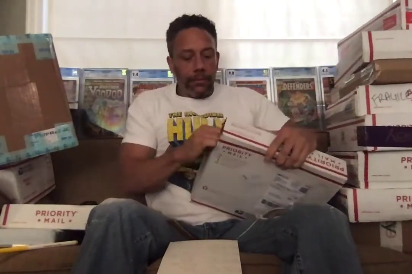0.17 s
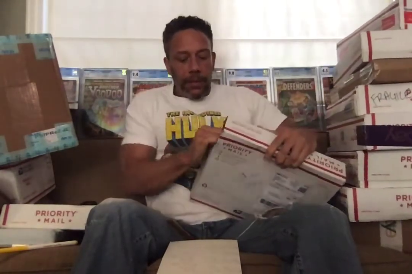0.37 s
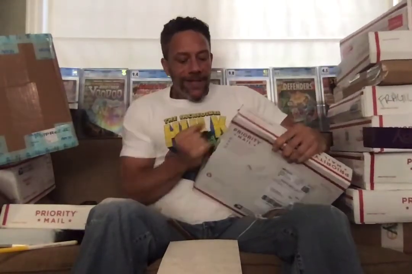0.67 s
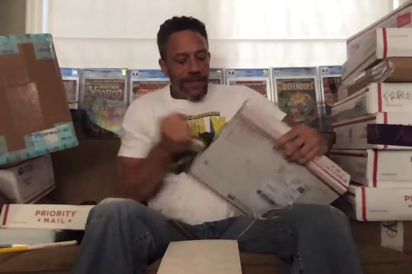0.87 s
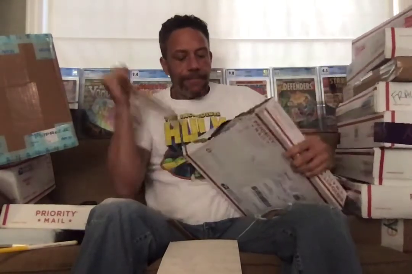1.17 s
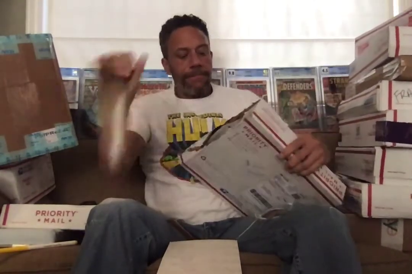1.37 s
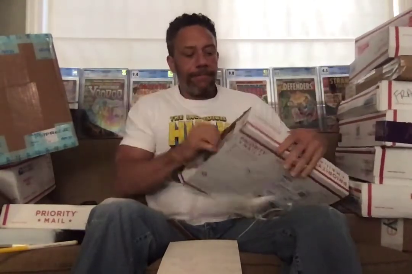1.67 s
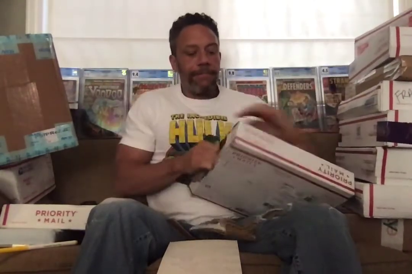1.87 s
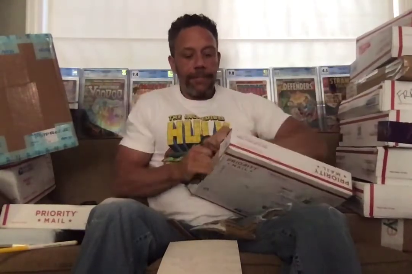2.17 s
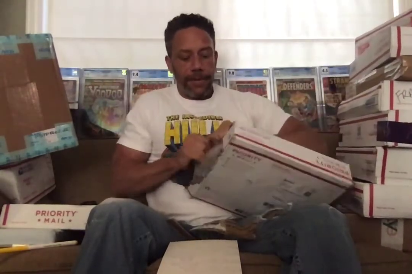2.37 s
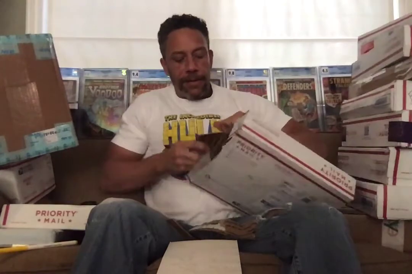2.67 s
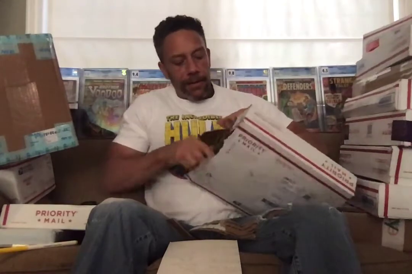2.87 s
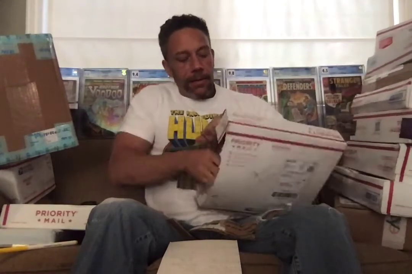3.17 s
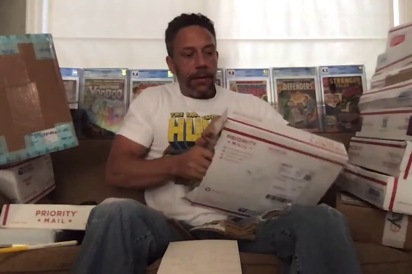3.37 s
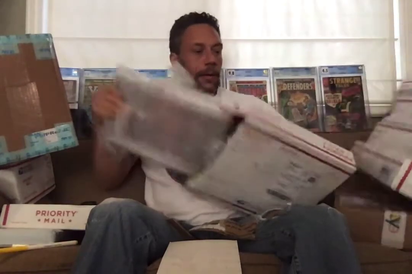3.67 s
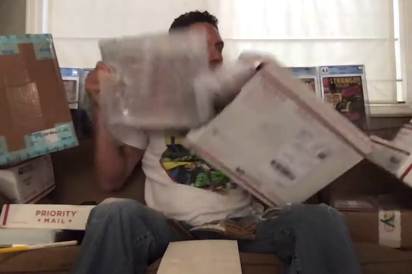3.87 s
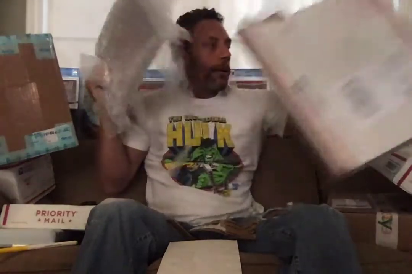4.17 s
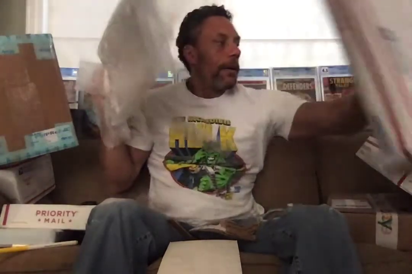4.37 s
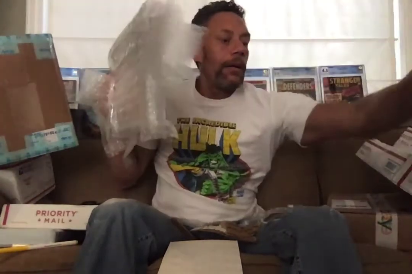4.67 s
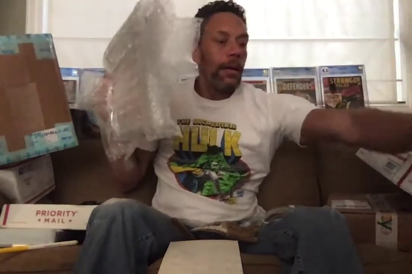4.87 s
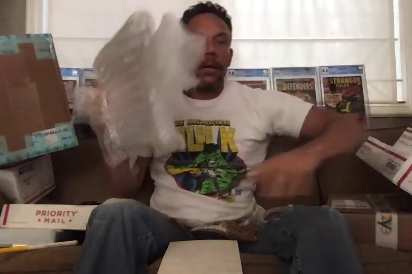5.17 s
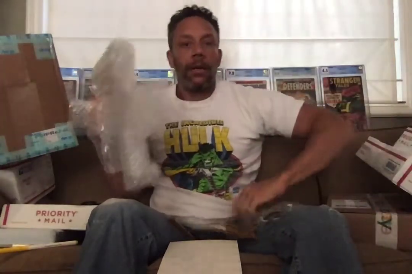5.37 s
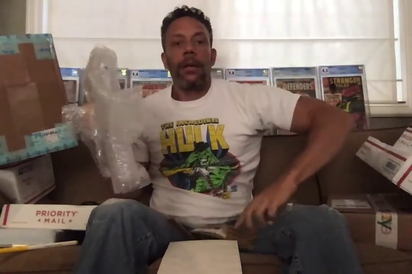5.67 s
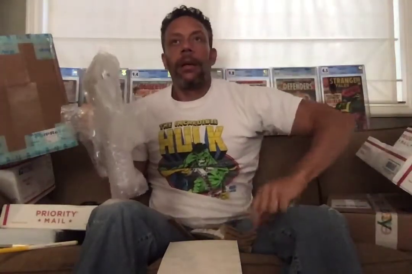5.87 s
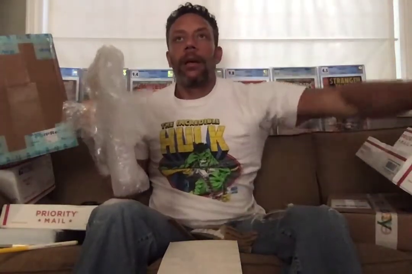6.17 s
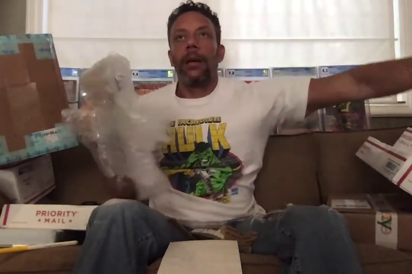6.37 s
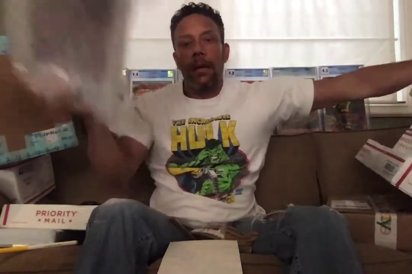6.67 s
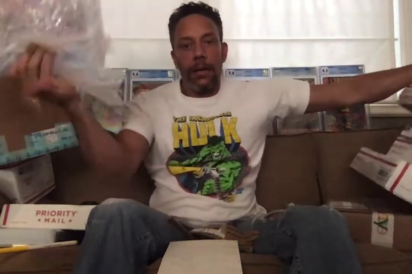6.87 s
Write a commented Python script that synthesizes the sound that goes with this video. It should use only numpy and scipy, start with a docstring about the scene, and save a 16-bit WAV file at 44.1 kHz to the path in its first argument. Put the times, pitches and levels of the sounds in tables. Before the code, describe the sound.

A small furnished room with a quiet low hush and deep faint rumble, heard by one nearby microphone. From 0 to 0.5 s card scuffs lightly under hands, with tiny cracks and a hollow bump. Between 0.55 and 1.2 s a tear strip rips in short fibrous jerks, with bright snaps near 0.65 s and another at 1.13 s. Until 2.5 s there are only soft scrapes and small creases. Around 2.5 to 3.1 s dull hollow bumps accompany sliding; scuffing grows from 3.1 s, with a crack at 3.43 and deeper knocks at 3.8 and 4.1. The tossed box booms loudest at about 4.2 s, thuds again at 4.53 and lands heavily at 5.03, with a brief raspy scrape near 5.15 and faint slaps by 5.3. Bubble wrap then rustles and ticks softly to 7 s, with a slightly sharper crackle at 6.7.

```python
"""Unpacking a cardboard box on a couch

Someone rips off a tear strip and drags out a bubble-wrapped packet: tiny clicks over hiss, shaped by hand moves.
The hollow box booms as fading sine modes under the hands, is tossed aside, thumps, tumbles and lands with a
slap of filtered noise. Creases snap, short bands of rasp stand out and panels judder; the wrap rustles on.
The even echo tail of a small furnished room, a quiet hush and a deep rumble surround it."""
import sys
import numpy as np
from scipy import signal
from scipy.io import wavfile
from scipy.ndimage import map_coordinates

SR = 44100
rng = np.random.default_rng(int(sys.argv[2]) if len(sys.argv) > 2 else 0)


def pcm_store(signal):
    """Save signal as 16-bit PCM."""
    levels = np.round(np.clip(np.atleast_2d(signal), -1, 1) * 32767)
    wavfile.write(sys.argv[1], SR, levels.astype(np.int16).T)


N = 310134  # length of the scene in samples

# In the three tables of hand moves, levels and relative levels are before the trims given to friction().

# Pulls on the tear strip. Each row: start in seconds, length in seconds, level in dB,
# low body in dB relative to that level, fine fizz in dB relative to that level.
PULL_MOVES = [(0.553, 0.11988, -34.5, -1, -5), (0.676, 0.0733, -45, -0.5, -2), (0.89, 0.048, -40, -7.5, 0),
              (0.934, 0.064, -30.5, -6.5, -1.5), (1.074, 0.05485, -44.5, -2.5, 0),
              (1.126, 0.025, -31, -2, -8), (1.157, 0.01291, -41.5, 5, -19)]
# Tension builds through a pull until the fibres let go. One row: attack in seconds, build from start
# to end in dB, arch of the middle over the ends in dB, release in seconds to fall 60 dB.
PULL_ENVELOPE = (0.0068, 7, 1.6, 0.12)


def tearing():
    """The strip parts the card fibre by fibre, in quick jerks."""
    fibres = crackle(per_s=6000, spread_db=3.0, clump_db=1.5, clump_per_s=210, hiss_db=-4)
    drifting = colour_drift(fibres, depth_db=3.0)
    return friction(drifting, PULL_MOVES, PULL_ENVELOPE, rasp_db=-4.0, body_db=3.5, fizz_db=-4.0)


# Card sliding under the hands. Each row: start in seconds, length in seconds, level in dB,
# low body in dB relative to that level, fine fizz in dB relative to that level.
SLIDE_MOVES = [(0.0, 0.046, -45, 4, -6.5), (0.067, 0.12, -53, -1.5, -3), (0.273, 0.048, -54, 3.5, -7),
               (0.393, 0.051, -57.5, 7, -29.5), (1.352, 0.05107, -53.5, -9, -1),
               (1.455, 0.095, -64.5, 3.5, -5), (1.677, 0.12, -48, -2, -3), (1.834, 0.13, -54.5, -3, -12),
               (2.072, 0.0897, -47, 0.5, -7.5), (2.197, 0.13, -58.5, 1.5, -4.5),
               (2.278, 0.04845, -47.5, -12, 0), (2.355, 0.07, -57.5, 8, -21.5),
               (2.44, 0.17, -48.5, 0.5, -3), (2.611, 0.13, -50.5, -9, -1.5), (2.778, 0.54, -53.5, 1, -1.5),
               (3.133, 0.19, -45.5, -3.5, -2.5), (3.394, 0.21, -42, -3, -2.5), (3.615, 0.21, -50, -4, -6),
               (3.759, 0.13, -42.5, -1, -6), (3.9, 0.13, -46.5, -1, -6),
               (4.003, 0.05096, -37.5, -5.5, -6.5), (4.085, 0.04537, -49, 9.5, -24),
               (4.667, 0.15, -60, 3, -8), (4.887, 0.075, -55.5, 9.5, -11), (5.15, 0.15, -48, 7.5, -11.5)]
# A slide speeds up and slows down again. One row: attack in seconds, build from start to end in dB,
# arch of the middle over the ends in dB, release in seconds to fall 60 dB.
SLIDE_ENVELOPE = (0.04, -2.5, 3, 0.6)


def rustling():
    """The packet drags out along the card: a dense, fine scuffing."""
    scuffs = crackle(per_s=1500, spread_db=4.0, clump_db=1.36, clump_per_s=110, hiss_db=2.0)
    drifting = colour_drift(scuffs, depth_db=3.5)
    return friction(drifting, SLIDE_MOVES, SLIDE_ENVELOPE, rasp_db=-3.0, body_db=1.5, fizz_db=-4.5)


# The bubble wrap shifts in the hand. Each row: start in seconds, length in seconds, level in dB,
# low body of the rustle in dB relative to that level, fine fizz in dB relative to that level.
WRAP_MOVES = [(5.388, 0.11, -53.5, 2.5, -8), (5.542, 0.091, -47, -7, -5.5), (5.695, 0.27, -54, -13, -5.5),
              (6.045, 0.049, -60.5, -15, 11), (6.076, 0.09, -50.5, -18, -0.5), (6.242, 0.026, -49, -6, 1),
              (6.507, 0.32, -54.5, -6, -5), (6.677, 0.087, -45.5, -10, -9), (6.764, 0.2583, -54, -9, -3)]
# The rustle fades in, sinks slightly and stops short. One row: attack in seconds, build from start
# to end in dB, arch of the middle over the ends in dB, release in seconds to fall 60 dB.
WRAP_ENVELOPE = (0.08, -2.5, -0.5, 0.01)


def crinkling():
    """Loose film buckles in sparse, separate ticks over its own swish."""
    ticks = crackle(per_s=310, spread_db=3.0, clump_db=2.0, clump_per_s=45, hiss_db=3)
    return friction(ticks, WRAP_MOVES, WRAP_ENVELOPE, rasp_db=-1.0, body_db=-0.5, fizz_db=-1.0)


# Colours of rubbing: the rasp of the surface, the low body of the sound, the finest fibres and film.
# Each row of all three: frequency in Hz, relative level in dB.
SURFACE_COLOUR = [(700, -23.5), (1100, -6), (1400, -3), (1650, -3.5), (2100, 2), (3000, -3), (4000, -3.5),
                  (5600, -12.5), (8000, -33.5)]
BODY_COLOUR = [(30, -8), (75, 10), (130, 7.5), (195, -7.5), (260, 3), (370, 0), (520, 0), (780, -3),
               (1250, -13), (1800, -29.5)]
FIZZ_COLOUR = [(3500, -35.5), (5500, -3), (6700, -2), (8000, -4), (10000, -7.5), (15000, -10.5),
               (16500, -16.5)]


def friction(drive, moves, envelope, rasp_db, body_db, fizz_db):
    """One crackle sounds as the rasp of the surface, as a low body and as fine fizz."""
    rasp_power, body_power, fizz_power = np.zeros((3, N))
    for start_s, length_s, db, body_relative_db, fizz_relative_db in moves:
        power = gesture(length_s, envelope) * amp(db) ** 2
        add(rasp_power, start_s, power * amp(rasp_db) ** 2)
        add(body_power, start_s, power * amp(body_relative_db + body_db) ** 2)
        add(fizz_power, start_s, power * amp(fizz_relative_db + fizz_db) ** 2)
    rasp = np.sqrt(rasp_power) * shaped(drive, SURFACE_COLOUR)
    body = np.sqrt(body_power) * shaped(drive, BODY_COLOUR)
    fizz = np.sqrt(fizz_power) * shaped(drive, FIZZ_COLOUR)
    return rasp + body + fizz


def gesture(length_s, envelope):
    """Power of one hand movement: attack, a tilted arch while it lasts, release."""
    attack_s, build_db, arch_db, release_s = envelope
    t = np.arange(round((length_s + release_s) * SR)) / SR
    done = np.minimum(t / length_s, 1)
    level_db = build_db * (done - .5) - arch_db * (2 * done - 1) ** 2
    fade_db = -60 * np.maximum(t - length_s, 0) / release_s
    return (np.minimum(t / attack_s, 1) * amp(level_db + fade_db)) ** 2


def crackle(per_s, spread_db, clump_db, clump_per_s, hiss_db, count=24):
    """Tiny ruptures of many sizes and colours, bunched by stick and slip, over smooth sliding hiss."""
    ruptures = rng.random(N) < per_s / SR
    sizes = amp(spread_db * np.minimum(rng.exponential(1, N), 5)) * ruptures
    kind = rng.integers(0, count, N)
    t = np.arange(128) / SR
    grains = rng.standard_normal((count, len(t))) * np.exp(-t / 0.00047)
    clicks = sum(np.convolve(sizes * (kind == k), evened(grains[k]))[:N] for k in range(count))
    hiss = amp(hiss_db) * rng.standard_normal(N)
    return evened((evened(clicks) + hiss) * amp(clump_db * wander(clump_per_s)))


def colour_drift(x, depth_db, per_s=22, per_octave=2.69):
    """Random patches of louder and softer colour drift over the rubbing sound."""
    hz, t, z = signal.stft(x, SR, nperseg=512)
    where = np.meshgrid(per_octave * np.log2(1 + hz / 200), t * per_s, indexing="ij")
    patches = map_coordinates(rng.standard_normal((48, 400)), where, order=1, mode="wrap")
    return signal.istft(z * amp(depth_db * patches), SR, nperseg=512)[1][:N]


# Short bands of coloured rasp noise, each around one pitch.
# Each row: middle in seconds, length in seconds, level in dB before the fades, pitch in Hz.
RASP_BANDS = [(0.411, 0.03, -50.5, 790), (0.737, 0.047, -39, 2160), (0.909, 0.075, -44.5, 2020),
              (1.407, 0.065, -52, 2200), (1.606, 0.02, -57.5, 1870), (2.279, 0.046, -48.5, 444),
              (2.318, 0.0301, -46, 10730), (2.379, 0.045, -44.5, 427), (2.51, 0.15, -49.5, 1350),
              (3.442, 0.027, -37, 3800), (4.042, 0.049, -38.5, 526), (4.043, 0.07, -45.5, 6040),
              (4.246, 0.06527, -43, 5800), (4.539, 0.03288, -44, 2304), (4.932, 0.1362, -51.5, 2080),
              (5.156, 0.041, -29, 2222), (5.227, 0.39, -47.5, 2240), (6.082, 0.074, -55.5, 2122),
              (6.714, 0.049, -40.5, 584), (6.732, 0.13, -47, 1030)]


def rasp_bands(sharpness=2.18):
    """Short bands of coloured rasp noise: crackle through one resonance, faded in and out."""
    drive = crackle(per_s=2400, spread_db=1.5, clump_db=-4.0, clump_per_s=170, hiss_db=-9.5)
    out = np.zeros(N)
    for middle_s, length_s, db, pitch_hz in RASP_BANDS:
        start_s = middle_s - length_s / 2
        piece = drive[round(start_s * SR):][:round(length_s * SR)]
        band = evened(ringing(piece, pitch_hz, sharpness))
        add(out, start_s, amp(db) * band * np.sqrt(np.hanning(len(piece))))
    return out


# Panels and air of the box.
# Each row: frequency in Hz, relative level in dB, time in seconds to fall 60 dB.
BOX_MODES = [(67.8, 5, 0.28), (103.84, -1.5, 0.26), (150, 1, 0.087), (211.04, 0, 0.068), (234.3, -0.5, .12),
             (270, -0.5, 0.11), (312.5, -2, 0.092), (364, 4.5, 0.073), (477, -1, 0.073), (650, -6, 0.088),
             (821.64, -8.5, 0.097), (977, -14, 0.044)]


def blows(reach_octaves=0.64, rise_s=0.00032, contact_cycles=2.6, slap_floor_hz=220, steepness=4.47, tick_db=-40):
    """Each blow booms the box modes near its centre, and the loose panels slap."""
    t, out = np.arange(SR // 2) / SR, np.zeros(N)
    hz, db, t60 = np.transpose(BOX_MODES)
    fades = amp(-60 * t / t60[:, None]) * (1 - np.exp(-t / rise_s))
    modes = np.sin(2 * np.pi * hz[:, None] * t) * fades
    signs = (-1) ** np.arange(len(hz))
    for s, boom_db, centre_hz, slap_db, bright_hz, slap_t60 in contacts():
        weights = amp(db) * np.exp(-.5 * (np.log2(hz / centre_hz) / reach_octaves) ** 2)
        boom = (weights * signs) @ modes / np.linalg.norm(weights)

        def softness(f):
            """Soft contact rolls the treble off; a faint dry tick stays above it."""
            thud = 1 / (1 + (f / bright_hz) ** steepness)
            tick = amp(tick_db) ** 2 / (1 + (f / 8000) ** 4)
            bass_cut = 1 + (slap_floor_hz / (f + 1)) ** 2
            return 10 * np.log10((thud + tick) / bass_cut)

        slap = evened(colour(rng.standard_normal(len(t)), softness))
        # a hard, bright contact also starts faster
        fading = amp(-60 * t / slap_t60) * (1 - np.exp(-t * bright_hz / contact_cycles))
        add(out, s, amp(boom_db) * boom + amp(slap_db) * slap * fading)
    return out


# Hands bump the box they hold.
# Each row: start in seconds, boom level in dB, centre of the modes reached in Hz.
HAND_BUMPS = [(0.296, -32, 400), (0.452, -44.5, 330), (1.451, -38.5, 286), (1.639, -39, 400),
              (2.536, -35, 202), (2.628, -30, 177), (2.666, -31.5, 139), (2.718, -35, 90),
              (2.943, -30.5, 378), (3.062, -35, 338), (3.523, -24.5, 234), (3.742, -30.5, 290),
              (3.804, -17, 106.5), (3.838, -22.5, 122), (4.097, -22.5, 230), (4.128, -23.5, 247.2)]
# A soft hand slaps faintly (dB relative to the boom); the higher the modes it reaches, the brighter.
KNOCK_SLAP_DB, KNOCK_BRIGHT_RATIO, KNOCK_T60_S = -15.5, 5.0, 0.11
# Card or film gives way with a sharp crack. Each row: start in seconds, crack level in dB before
# its rise and fade, boom level in dB, brightness in Hz.
SHARP_CRACKS = [(0.127, -33, -48, 1800), (0.139, -30.5, -55, 1590), (0.557, -29, -22, 3040),
                (0.656, -20.5, -20, 4850), (0.668, -18.5, -34, 4450), (1.128, -27.5, -25, 7000),
                (3.432, -28, -43, 4360), (6.251, -40, -58, 5220), (6.701, -33, -52, 1800)]
CRACK_CENTRE_HZ, CRACK_T60_S = 400, 0.03
# The tossed box hits, tumbles and lands. Each row: start in seconds, boom level in dB, centre of the modes
# reached in Hz, slap level in dB before its rise and fade, slap brightness in Hz, seconds for the slap to fall 60 dB.
BOX_LANDINGS = [(4.188, -17, 130, -16, 650, 0.31), (4.203, -15.5, 140, -19, 1850, 0.12),
                (4.228, -2, 220, -12, 1087, 0.09), (4.236, -12, 432.6, -34.5, 700, 0.059),
                (4.272, -16.5, 111, -26, 690, 0.2194), (4.531, -8, 181.1, -15, 604.9, 0.032),
                (4.544, -10, 240, -28, 1342, 0.1), (4.612, -20.5, 166, -28, 448, 0.08445),
                (5.029, -4.5, 143.6, -15.5, 756, 0.18), (5.048, -13, 450, -24, 1280, 0.063),
                (5.063, -8, 123, -27, 551, 0.045), (5.136, -25, 196, -24, 2025, 0.21446),
                (5.314, -27, 150, -28, 1830, 0.19), (5.337, -25.5, 232.3, -26.5, 3700, 0.15)]


def contacts():
    """Every blow on the box, as (s, boom dB, centre Hz, slap dB, brightness Hz, slap t60 s)."""
    knocks = [(s, db, hz, db + KNOCK_SLAP_DB, hz * KNOCK_BRIGHT_RATIO, KNOCK_T60_S)
              for s, db, hz in HAND_BUMPS]
    cracks = [(s, boom_db, CRACK_CENTRE_HZ, crack_db, bright_hz, CRACK_T60_S)
              for s, crack_db, boom_db, bright_hz in SHARP_CRACKS]
    return knocks + cracks + list(BOX_LANDINGS)


# A panel juddering as the box skids.
# Each row: start in seconds, length in seconds, level in dB, pitch halfway through in Hz.
PANEL_JUDDERS = [(1.137, 0.013893, -26.5, 372.3), (4.189, 0.03093, -4, 232.5), (4.353, 0.021, -30.5, 270),
                 (4.9, 0.0244, -43, 330), (5.031, 0.025, -15.5, 496), (5.059, 0.02, -16.5, 289.5)]


def judders(overtone_db=-19, ring_s=0.0019, sag=0.097):
    """Stick and slip locks onto one panel mode, which swells, sags in pitch and stops."""
    out = np.zeros(N)
    for start_s, length_s, db, pitch_hz in PANEL_JUDDERS:
        t = np.arange(round(2 * length_s * SR)) / SR
        sagging_hz = pitch_hz * (1 + sag * (.5 - t / length_s))
        phase = 2 * np.pi * np.cumsum(sagging_hz) / SR
        swing = (1 - np.exp(-t / ring_s)) * np.exp(-np.maximum(t - length_s, 0) / ring_s)
        tone = np.sin(phase) + amp(overtone_db) * np.sin(2 * phase)
        add(out, start_s, amp(db) * swing * tone)
    return out


# Single creases snapping over. Each row: start in seconds, level in dB before the decay, pitch in Hz.
CREASES = [(1.371, -47.5, 2800), (1.476, -46.5, 2150), (1.64, -41, 2310), (1.975, -50, 2060),
           (2.121, -41.5, 2280), (2.287, -42.5, 5900), (2.824, -43, 8000), (3.564, -33.5, 2620),
           (3.932, -45, 6860), (4.1, -56, 7200), (4.693, -54, 2400), (4.934, -44, 2240),
           (4.969, -48.5, 2400), (5.903, -53, 8900), (6.133, -40, 4390), (6.654, -46, 5000),
           (6.813, -42.5, 3500), (6.88, -41, 5000), (6.901, -60, 6000)]


def snaps(decay_s=0.0052, sharpness=1.0):
    """A crease flips: a few milliseconds of crack around one pitch."""
    t, out = np.arange(SR // 20) / SR, np.zeros(N)
    for start_s, db, pitch_hz in CREASES:
        crack = evened(ringing(rng.standard_normal(len(t)), pitch_hz, sharpness))
        add(out, start_s, amp(db) * crack * np.exp(-t / decay_s))
    return out


def ringing(x, pitch_hz, sharpness):
    """A broad resonance with steep skirts."""
    def gain_db(f):
        detuning = f / pitch_hz - pitch_hz / (f + 1)
        return -20 * np.log10(1 + (sharpness * detuning) ** 2)
    return colour(x, gain_db)


def amp(db):
    """Decibels to gain."""
    return 10 ** (np.asarray(db) / 20)


def evened(x):
    """Scales to an rms of one."""
    return x / np.sqrt(np.mean(x ** 2) + 1e-20)


def read(points, hz):
    """Reads a table on a log-frequency axis."""
    f, value = np.transpose(points)
    return np.interp(np.log(hz + 1), np.log(f + 1), value)


def add(mix, s, sound):
    """Adds a sound to the mix at a time in seconds."""
    part = mix[max(round(s * SR), 0):][:len(sound)]
    part += sound[:len(part)]


def colour(x, gain_db, size=4096):
    """Causal filter whose gain is a function of frequency."""
    hz = abs(np.fft.fftfreq(size, 1 / SR))
    log_gain = np.log(amp(gain_db(hz)) + 1e-5)
    # minimum phase: the filter responds as early as it can
    kernel = np.fft.ifft(np.exp(np.conj(signal.hilbert(log_gain)))).real
    return signal.oaconvolve(x, kernel[:size // 2])[:len(x)]


def shaped(x, points):
    """Gives x a spectrum whose skirts fall away outside the table, at unit rms."""
    def gain_db(hz):
        octaves_outside = abs(np.log2((hz + 1) / np.clip(hz + 1, points[0][0], points[-1][0])))
        return read(points, hz) - 20 * octaves_outside
    return evened(colour(x, gain_db))


def wander(per_s):
    """Random values of unit spread, joined by straight lines."""
    knots = rng.standard_normal(4096)
    return np.interp(np.arange(N) / SR * per_s, np.arange(len(knots)), knots, period=len(knots))


def room(x, half_turns_per_s=1.315, count=3, wet_db=-6):
    """Blends three random echo patterns in turn, for an even, uncoloured room tail."""
    turn = np.pi * (half_turns_per_s * np.arange(N) / SR + np.arange(count)[:, None] / count)
    shares = np.sqrt(2 / count) * np.cos(turn)
    echoes = sum(signal.fftconvolve(x * share, reflections())[:N] for share in shares)
    return x + amp(wet_db) * echoes


# How long the room's echoes last. Each row: frequency in Hz, time in seconds to fall 60 dB.
ECHO_TIMES = [(80, .3), (250, 0.5038), (1000, 0.37), (3000, 0.37852), (8000, 0.34), (15000, 0.42)]


def reflections(first_s=0.0034):
    """Close walls and furniture: dense echoes of random sign, each band dying at its own speed."""
    taps = rng.choice([-1., 1.], SR // 2) * (rng.random(SR // 2) < 6000 / SR)  # 6000 echoes per second
    taps *= np.arange(len(taps)) > first_s * SR
    hz, t, z = signal.stft(taps, SR, nperseg=256)
    fading = amp(-60 * t / read(ECHO_TIMES, hz)[:, None])
    tail = signal.istft(z * fading, SR, nperseg=256)[1]
    couch = lambda f: -10 * np.log10(1 + (560 / (f + 20)) ** 2)  # upholstery soaks up the bass
    return colour(tail / np.linalg.norm(tail), couch)


# The colour of the quiet room. Each row: frequency in Hz, relative level in dB.
HUSH_COLOUR = [(20, -2), (40, -0.5), (80, -1), (112, 5.5), (145, -10.5), (220, -18), (400, -19.5),
               (800, -32), (3000, -30.5), (15000, -43.5)]
HUSH_DB = -58.5
# Deep rumble: a long faint bed and shorter swells. Each row: middle in seconds,
# seconds from there until its gain is down to about a third, peak level in dB.
RUMBLE_SWELLS = [(0.8, 0.35, -46.5), (2.5, 3.665, -57.5), (4.58, 0.076, -43), (5.25, 0.16, -44.5)]


def background():
    """Steady room hush and a deep rumble: a long faint bed and shorter swells."""
    t = np.arange(N) / SR
    swell = sum(amp(db) * np.exp(-((t - s) / width_s) ** 2) for s, width_s, db in RUMBLE_SWELLS)
    rumble = shaped(rng.standard_normal(N), [(18, -8.5), (31, 3.5), (45, -17.5), (70, -16)])  # Hz, dB
    hush = amp(HUSH_DB) * shaped(rng.standard_normal(N), HUSH_COLOUR)
    return hush + swell * rumble


def scene():
    """All the handling in the room, heard by one microphone."""
    rubbing = tearing() + rustling() + crinkling() + rasp_bands()
    handling = rubbing + blows() + judders() + snaps()
    return (room(handling) + background())[None]


def record(dry, ceiling=.72, edge_hz=15850):
    """The loudest thumps round off against the ceiling; then the treble stops at the band edge."""
    limited = dry / (1 + (dry / ceiling) ** 6) ** (1 / 6)
    lowpass = signal.firwin(511, edge_hz, window=("kaiser", 9), fs=SR)
    return signal.oaconvolve(limited, lowpass[None], "same")


dry = scene()
out = record(dry)
pcm_store(out)
```